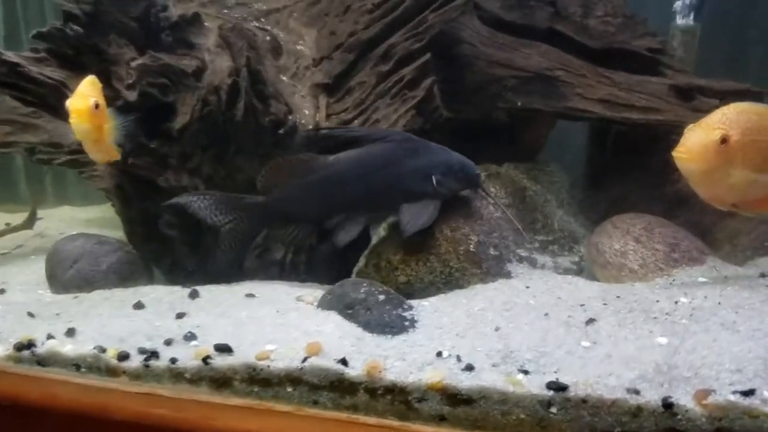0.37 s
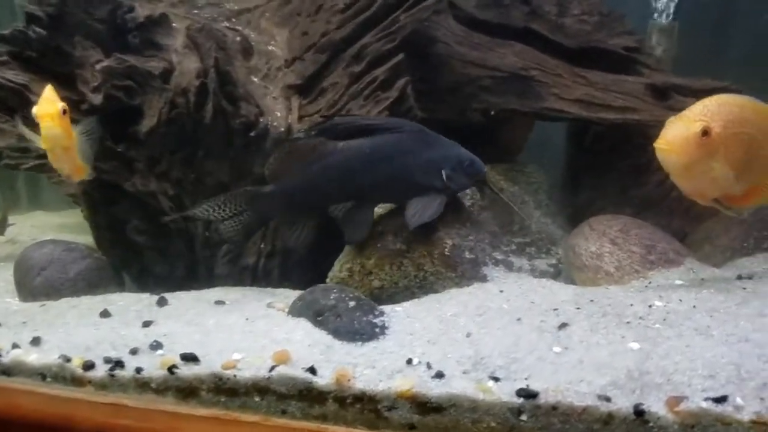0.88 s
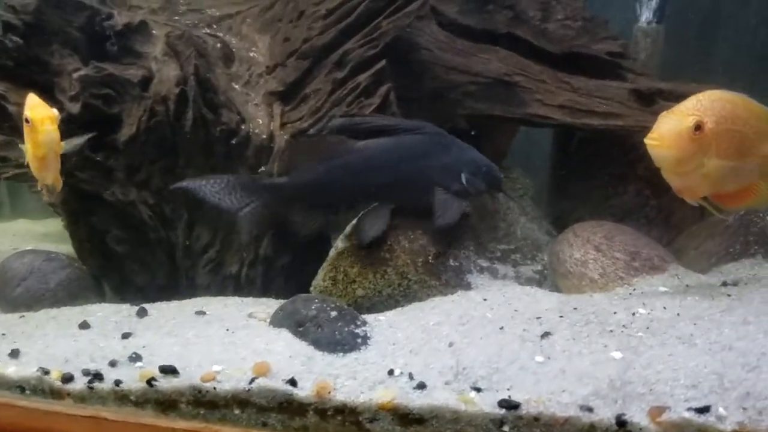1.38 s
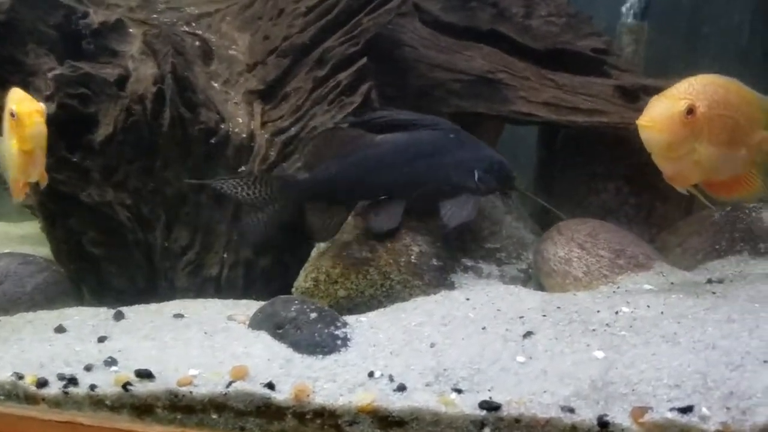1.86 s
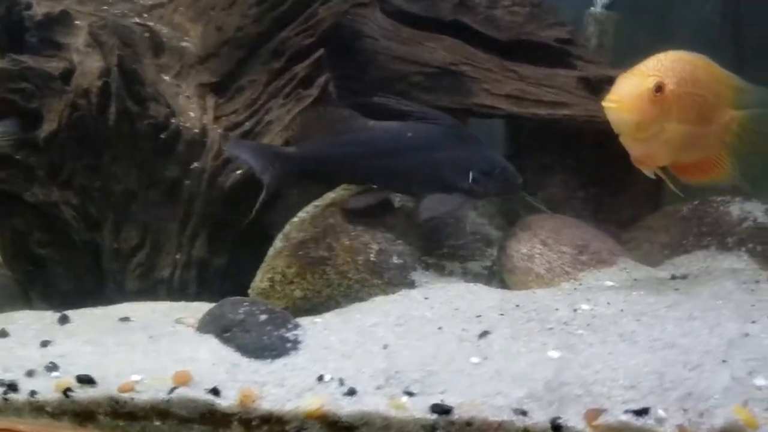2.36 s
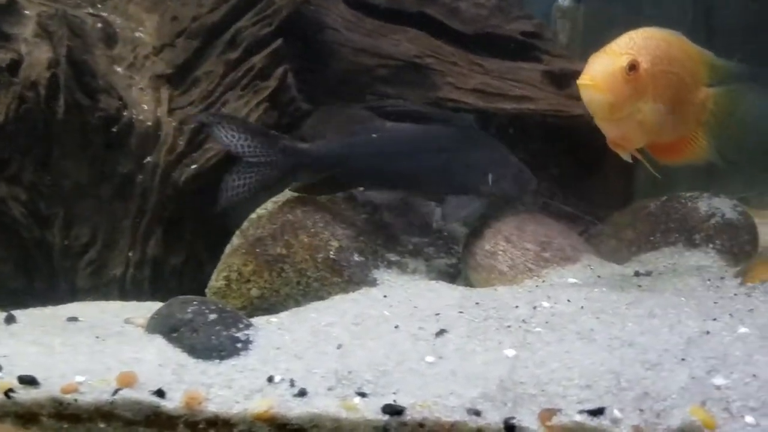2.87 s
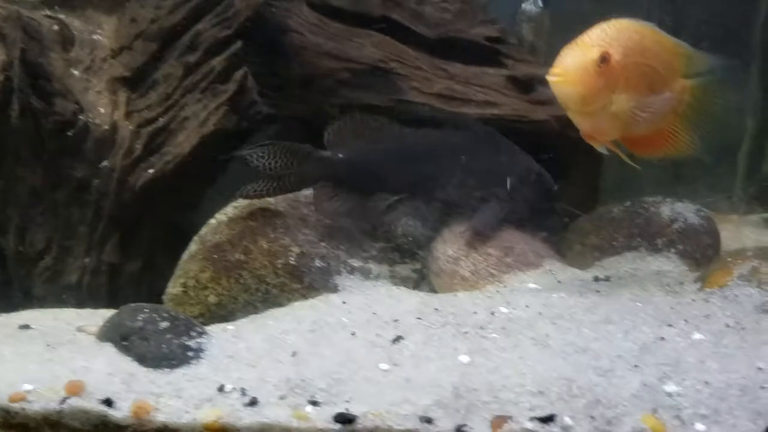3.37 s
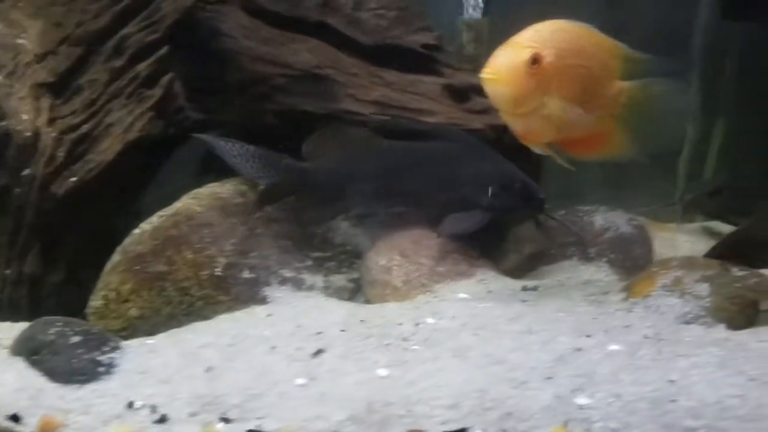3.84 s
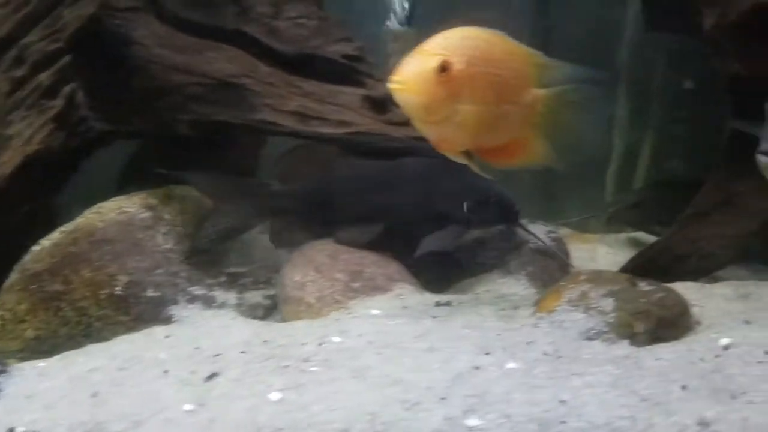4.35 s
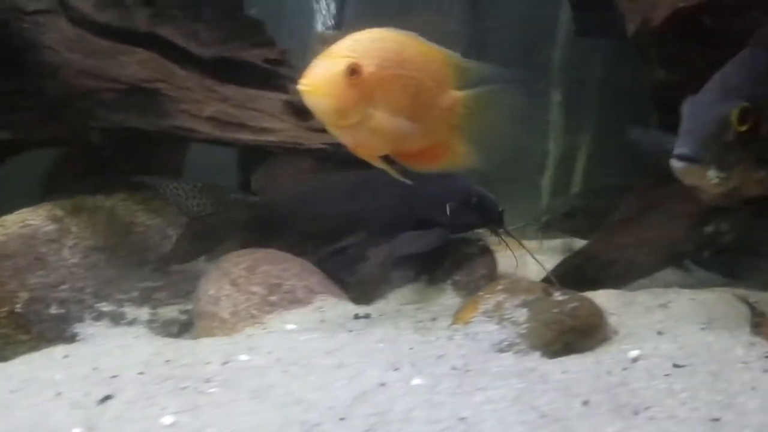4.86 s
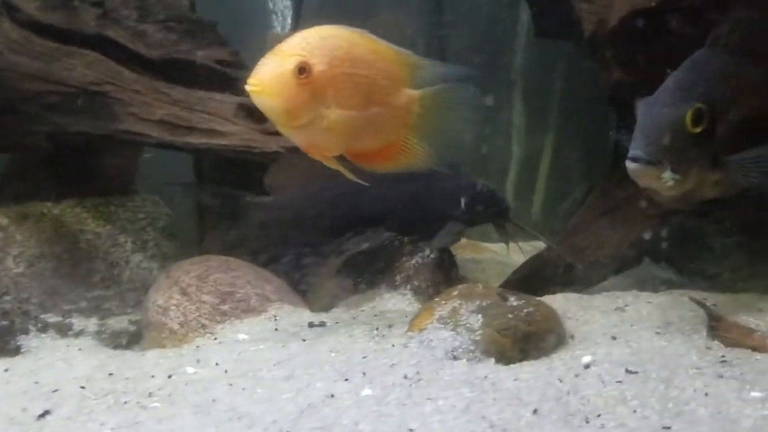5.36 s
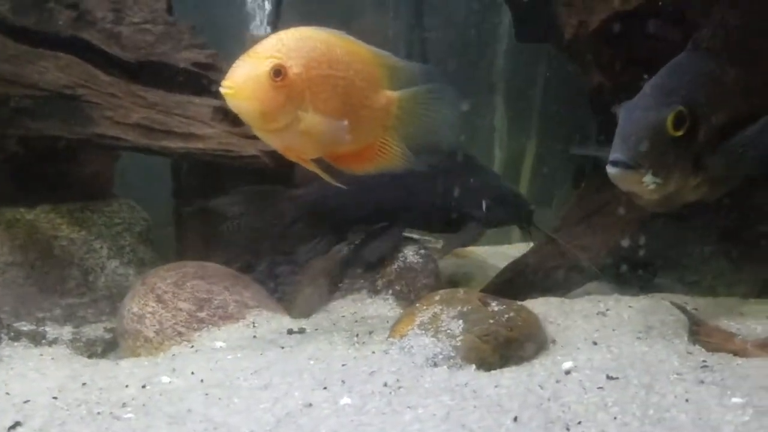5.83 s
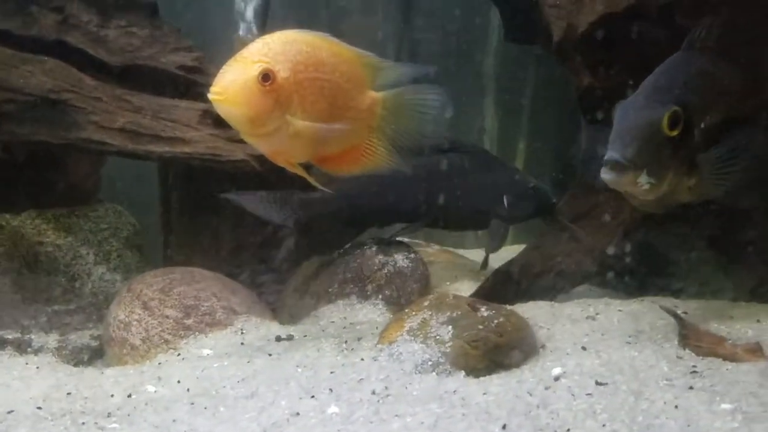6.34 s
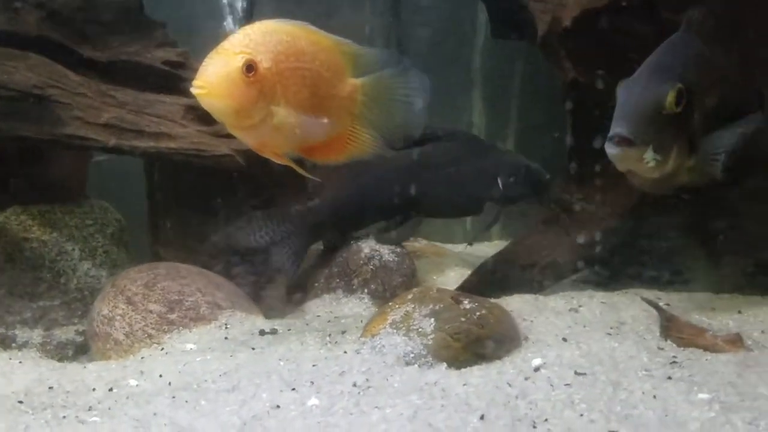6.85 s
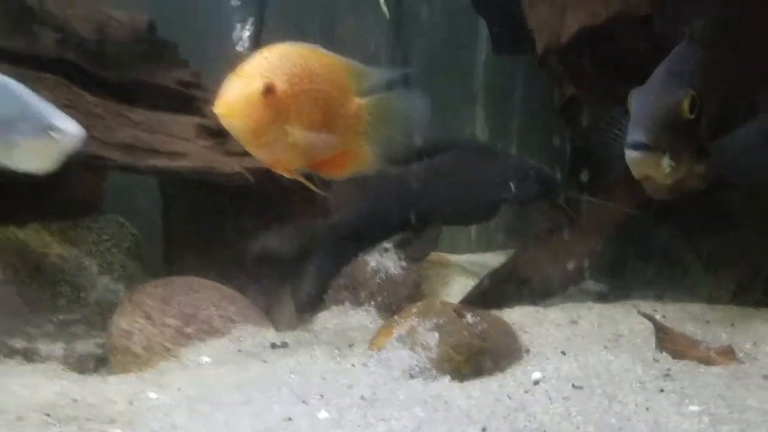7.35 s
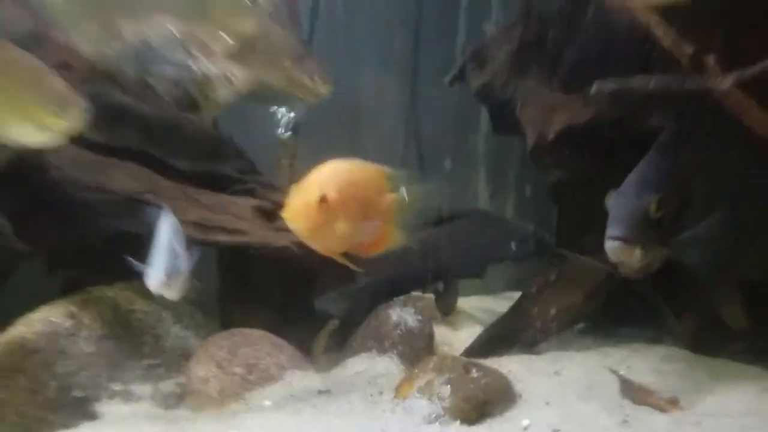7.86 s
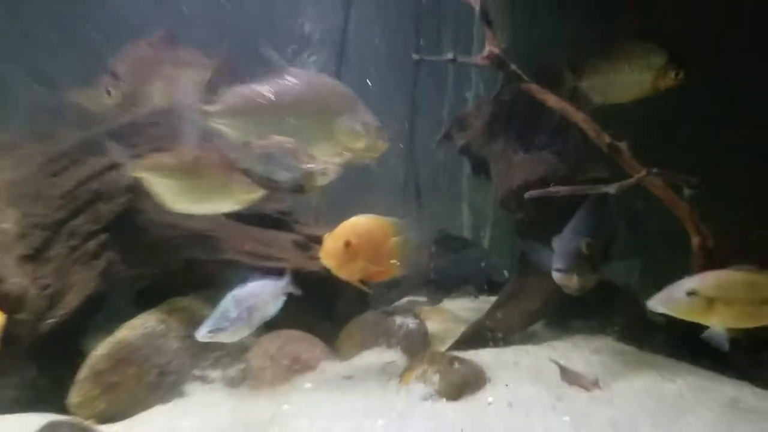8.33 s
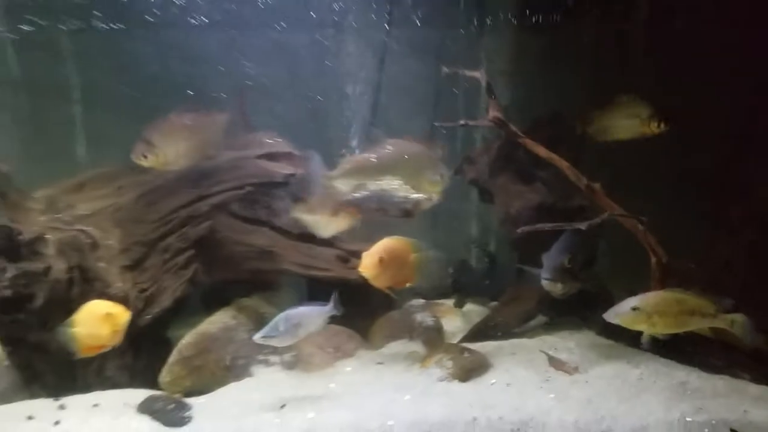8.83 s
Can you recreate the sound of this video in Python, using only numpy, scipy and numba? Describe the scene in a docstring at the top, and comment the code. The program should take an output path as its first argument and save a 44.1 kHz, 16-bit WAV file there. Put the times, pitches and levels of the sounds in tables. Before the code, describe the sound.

From 0 to about 9 seconds a fish tank pump hums continuously indoors: a low 60-hertz-family drone, strongest around 120 and 240 hertz, over a soft rumble of motor and air noise. Much quieter above it are a wavering rotor whine near 850 hertz, gurgling trickle and a smooth fine-bubble fizz. Tiny, very high bubble pops with short bright echoes come irregularly, a sharper one near 3.4 seconds, and clustering more densely from 5 to 7.5. Fizz swells lightly around 1.7 and 3.7. The hand-held stereo phone drifts along the glass, slowly shifting the hum's tone as the whine emerges. Faint tones swell near 3.5, 7.2 and 7.7 seconds. From about 7.5 the phone steps back; trickle and hiss rise, with brief fizz surges near 8.3 and 8.8, while the whine recedes and the hum continues to the end.

```python
"""A pump hums in an indoor fish tank, over trickling water and tiny bubbles that pop with short bright echoes.
The hum is a sum of mains overtones plus a rotor whine; trickle, fizz and pops are dying sines of climbing pitch.
A few faint notes swell up; below lies a rumble of noise lifted or cancelled at the cabinet and room modes.
A hand-held phone with a port at each end hears it while it drifts along the glass and at last steps back."""
import sys
import numpy as np
from scipy import signal
from scipy.fft import rfft, irfft
from scipy.io import wavfile
from scipy.ndimage import uniform_filter1d
from numba import njit

SR = 44100
rng = np.random.default_rng(int(sys.argv[2]) if len(sys.argv) > 2 else 0)


def store_wav(level_fs):
    """Save 16-bit WAV to argv[1]."""
    pcm = np.round(np.clip(np.atleast_2d(level_fs), -1, 1) * 32767)
    wavfile.write(sys.argv[1], SR, pcm.T.astype(np.int16))


def invert_db(x):
    """Field ratio 10**(x/20) for x, a level in decibels (scalar or array-like)."""
    u = np.asarray(x, float) / 20
    return 10 ** u


N = 395136
T = np.arange(N) / SR
HZ = np.arange(N // 2 + 1) * SR / N

# The phone's way along the glass, then back into the room. Each row: time in seconds, metres travelled.
PATH = [(0.0, 0.056), (1.5, 0.036), (3.0, 0.087), (4.5, 0.21), (6.0, 0.25), (7.3, 0.24), (8.0, 0.34),
        (8.96, 0.4)]
WAY_M = np.interp(T, *np.transpose(PATH))
STEP_BACK_M = 0.27  # beyond this the open surface comes into view
BACK_M = np.maximum(WAY_M - STEP_BACK_M, 0)
WAVER_DB = 1.3
POP_CYCLES = 3.2  # ring time in cycles


def level(x, db):
    """Scale to an rms level."""
    return x * invert_db(db) / np.sqrt(np.mean(x ** 2))


def over_hz(table, column=1):
    """Interpolate a dB column over log frequency."""
    table = np.array(table, float)
    return np.interp(np.log(HZ + 1), np.log(table[:, 0]), table[:, column])


def walk(rate_hz):
    """Slow random drift of spread 1: smoothed random steps."""
    k = int(SR / rate_hz)
    steps = np.repeat(rng.standard_normal(N // k + 1), k)
    x = uniform_filter1d(uniform_filter1d(steps, k), k)[:N]
    return x / x.std()


def standing(hz, swing_db, crest_rad, way_m):
    """Level change along a standing wave, which repeats every half wavelength."""
    return swing_db * np.cos(4 * np.pi * hz * way_m / 343 - crest_rad)


def bell(start_s, length_s):
    """Bell-shaped swell of height 1, centred on start_s."""
    return np.exp(-0.5 * (2 * (T - start_s) / length_s) ** 2)


def swells(table, db_per_m):
    """Bell-shaped rises in dB, on top of the gain from stepping back."""
    return db_per_m * BACK_M + sum(db * bell(s, length_s) for s, length_s, db in table)


@njit
def grains(start, hz, cycles, glide, size, length):
    """Each bubble is a dying sine whose pitch climbs by `glide` over its ring time."""
    out = np.zeros(length)
    for k in range(len(start)):
        ring = cycles[k] * SR / hz[k]
        phase = 0.0
        for i in range(min(int(5 * ring), length - start[k])):
            f = min(hz[k] * (1 + glide[k] * i / ring), 0.45 * SR)
            phase += 2 * np.pi * f / SR
            out[start[k] + i] += size[k] * np.exp(-i / ring) * np.sin(phase)
    return out


def swarm(count, low_hz, high_hz, cycles, glide, scatter_db):
    """Bubbles at random moments and sizes, middling pitches most common; 0 dB rms in all."""
    when, pitch_a, pitch_b, big = rng.random((count, 4)).T
    start = (when * N).astype(np.int64)
    hz = low_hz * (high_hz / low_hz) ** ((pitch_a + pitch_b) / 2)
    size = invert_db(-scatter_db * np.log(big + 1e-6))
    one = np.ones(count)
    return level(grains(start, hz, cycles * one, glide * one, size, N), 0)


def at_ports(a, b):
    """Two unrelated signals become the room field at two spaced ports: alike in the bass, unalike above."""
    lag_s, along = 0.00044, 0.27  # port spacing as travel time, share of sound along the axis
    turn = 2 * np.pi * HZ * lag_s
    like = (1 - along) * np.sinc(turn / np.pi) + along * np.exp(-1j * turn)
    like = like / (1 + (HZ / 5200) ** 2)
    a, b = rfft(a), rfft(b)
    return irfft(np.array([a, like * a + np.sqrt(1 - abs(like) ** 2) * b]), N)


def pump():
    """The armature beats once per mains cycle, so overtones peak together; higher ones lag in the housing."""
    # Strong overtones, each a standing wave along the way. Each row: multiple of mains,
    # mean level in dB, swing in dB, place of the crest in rad, left minus right in dB.
    strong = [(2, -42, 1.3, 0.1, 0.8), (3, -51.5, 5, 1.4, 2.0), (4, -46, 2, 2.16, 0.1), (6, -61, 6.5, 1, 4),
              (7, -67, 4, 3, 16)]
    # Steadier weak overtones. Each row: multiple of mains, level in dB, left minus right in dB.
    weak = [(5, -70.5, 24.5), (8, -67.5, 13.5), (9, -67.5, 12), (13, -94, -8)]
    mains_hz, right_lag_s = 60, 0.00026
    side = np.array([[0.5], [-0.5]])
    overtones = [(k, db + standing(k * mains_hz, swing_db, crest_rad, WAY_M), pan_db)
                 for k, db, swing_db, crest_rad, pan_db in strong]
    hum = 0
    for k, db, pan_db in overtones + weak:
        # short high overtones waver as the hand moves through their standing waves
        waver_db = (k > 4) * WAVER_DB * walk(3)
        lag_rad = max(k - 4, 0) * (1.03 + 0.18 * walk(1.48))
        wave = np.cos(2 * np.pi * k * mains_hz * (T + side * right_lag_s) - lag_rad)
        hum = hum + invert_db(db + side * pan_db + waver_db) * wave
    return np.sqrt(2) * hum


def whine():
    """Wavering rotor tone that comes out from behind the cabinet, then fades on stepping back."""
    hz, clear_db, shade_db, clear_m, fade_db_per_m = 853.8, -65, -16, 0.1, 25
    db = clear_db + shade_db * np.exp(-WAY_M / clear_m) - fade_db_per_m * BACK_M
    tone = np.cos(2 * np.pi * hz * T + 0.9 * walk(2.2))
    return np.sqrt(2) * invert_db(db + WAVER_DB * walk(2.95)) * tone


def trickle():
    """A dense stream of mid-sized bubbles under the returning water, gurgling in soft patches."""
    # Swells of the trickle. Each row: centre in seconds, length in seconds, rise in dB.
    gurgles = [(4.33, 0.15, 2), (8.0, 0.33, 1.5)]
    base_db, water_db_per_m, gurgle_db = -66.5, 24, 0.8
    water = at_ports(*(swarm(count=12000, low_hz=1234, high_hz=4270, cycles=5.2, glide=0.036,
                             scatter_db=0.3) for _ in range(2)))
    return water * invert_db(base_db + swells(gurgles, water_db_per_m) + gurgle_db * walk(6.4))


def fizz():
    """Smooth fizz of countless fine bubbles, unrelated at the two ports."""
    # Fine bubbles surfacing together. Each row: centre in seconds, length in seconds, rise in dB.
    shoals = [(1.67, 0.33, 4.5), (3.72, .5, 3), (5.37, 0.45, 1.5), (8.33, .13, 8), (8.8, 0.22, 7)]
    base_db, fizz_db_per_m = -71.5, 13
    fine = np.array([swarm(count=50000, low_hz=5430, high_hz=19500, cycles=3.3, glide=0.05,
                           scatter_db=1.1) for _ in range(2)])
    return fine * invert_db(base_db + swells(shoals, fizz_db_per_m) + 0.98 * walk(12))


def echo(x):
    """Glass, lid and walls spread pops into a short dense tail, new every 40 ms as bubbles burst elsewhere."""
    t60_s, rise_s, block = 0.16, 0.0016, 1764
    t = np.arange(5 * block) / SR
    shape = (1 - np.exp(-t / rise_s)) * np.exp(-np.log(1000) * t / t60_s)
    shape = shape / np.sqrt(np.sum(shape ** 2))
    out = np.zeros((2, N + 6 * block))
    for i in range(0, N, block):
        tail = rng.standard_normal((2, len(t))) * shape
        wet = signal.fftconvolve(x[None, i:i + block], tail, axes=1)
        out[:, i:i + wet.shape[1]] += wet
    return out[:, :N]


def pops():
    """Single bubbles burst at the surface among scattered faint ones, heard by lid reflections and echo."""
    # Single bursts. Each row: start in seconds, peak before the burst gain in dB, heard pitch in Hz.
    bursts = [(0.0558, -61, 10500), (0.4045, -62, 11200), (0.4614, -61, 12000), (0.6679, -61, 10100),
              (0.7008, -54, 13400), (0.8415, -58, 9930), (0.9887, -53.5, 10800), (1.0914, -60, 10600),
              (1.2476, -58, 10800), (1.496, -49.5, 12100), (1.5609, -64, 10800), (1.6551, -58, 13000),
              (2.575, -54.5, 11200), (3.0255, -58, 12200), (3.048, -53, 14800), (3.2176, -61, 10000),
              (3.3064, -58, 12200), (3.3732, -43, 13300), (3.4665, -59, 10600), (3.6406, -62, 10000),
              (3.775, -56, 12300), (3.918, -52, 11900), (4.0138, -61, 9600), (4.0672, -58, 10400),
              (4.6234, -55, 10600), (4.7726, -51.5, 12200), (4.8973, -58, 10700), (4.9317, -60, 13800),
              (5.0155, -54, 9800), (5.2604, -62, 10200), (5.2829, -54, 10800), (5.393, -53, 11700),
              (5.547, -56, 12100), (5.7548, -56, 10000), (5.8551, -60, 8860), (5.882, -53.5, 9750),
              (5.9743, -57, 9900), (5.9953, -54, 12600), (6.0571, -58, 11400), (6.1494, -56, 9700),
              (6.1739, -57, 9260), (6.2208, -59, 9740), (6.3046, -59, 11800), (6.575, -58, 10300),
              (6.6787, -61, 14300), (6.7615, -53, 14300), (6.8344, -56, 12200), (6.8583, -51, 11500),
              (6.9606, -59, 14380), (7.1506, -54, 14800), (7.234, -56, 11500), (7.2634, -55, 14300),
              (7.3073, -58, 9600), (7.3457, -58, 9860), (7.3811, -62.5, 10700), (7.5318, -60.5, 14200),
              (7.881, -57, 10500), (7.9733, -57, 10000), (8.1609, -57.5, 8800), (8.2172, -59, 10800),
              (8.5525, -56, 10400), (8.6298, -53.5, 10000)]
    burst_db = 13.5  # energy is spread over the whole echo, so the burst itself is far louder
    pitch_start, lid_db = 0.85, -23.5  # first pitch as a share of the heard one
    faint = swarm(count=400, low_hz=6450, high_hz=16000, cycles=POP_CYCLES, glide=0.14, scatter_db=0.5)
    s, peak_db, hz = np.transpose(bursts)
    one = np.ones(len(s))
    single = grains((s * SR).astype(np.int64), pitch_start * hz, POP_CYCLES * one, 0.24 * one,
                    invert_db(peak_db), N)
    dry_pops = invert_db(burst_db) * (invert_db(-88.5) * faint + single)
    # first few ms of reflections under the lid: the crisp edge
    lid = rng.standard_normal((2, 260)) * np.exp(-np.arange(260) / 120)
    edge = signal.fftconvolve(dry_pops[None], lid, axes=1)[:, :N]
    return invert_db(lid_db) * edge + echo(dry_pops)


def notes():
    """Faint tones of slightly wavering phase that swell up briefly."""
    # Each row: centre in seconds, length in seconds, pitch in Hz, peak in dB.
    tones = [(7.2, .12, 790, -59), (7.7, .25, 780, -59.5), (3.5, .5, 736, -65)]
    return sum(invert_db(db) * bell(s, length_s) * np.cos(2 * np.pi * hz * T + 1.2 * walk(6))
               for s, length_s, hz, db in tones)


def rumble(count=8):
    """Motor and air noise shaped by room and cabinet modes, crossfaded between places along the way."""
    # Broad noise spectrum. Each row: frequency in Hz, relative density in dB per Hz.
    spectrum = [(6, -45), (15, -25), (30, -6), (60, -7), (100, -6.5), (170, -4.5), (260, -9.5),
                (400, -17.5), (700, -21.5), (1200, -28.5), (1700, -35), (2500, -39.5), (3800, -42.5),
                (6000, -44), (9000, -52), (16000, -62)]
    # Modes that lift or cancel the noise. Each row: frequency in Hz, width in Hz,
    # mean lift in dB, swing in dB, place of the crest in rad.
    modes = [(36.3, 6.0, 9, 0, 2.3), (51.0, 8.0, 2.5, 7, 0), (72.8, 4, 6.5, 20, 2.25),
             (86, 9.5, -10, 13, 1.6), (145, 6.4, -5, 6.5, 0.1), (161.2, 3.8, 6.5, 1.5, -0.15),
             (194.2, 19, -0.7, 9, 0.92), (226, 8.1, 3, 6, -2.3), (329.7, 10.4, 6.5, 1, -2.9),
             (380.0, 5, 0.5, -10, -13), (393, 14, 2, 3.5, 0.6), (406, 12, -4.5, 4.5, 1),
             (431, 4.9, 5.5, 5, 2.5), (458.0, 14.0, 1, 9.5, 8), (501, 20, 6, 3, 0.6),
             (528, 10, 2.5, 7, -1.2), (589, 48.0, 4, -0.8, -4), (652.0, 33, 3.5, 3.5, 2.5),
             (730, 11.0, 9.5, 4, 3.5), (772, 11, 4, 1, -3), (884, 33, 3.5, 1.7, 2), (927, 19.0, 3, 2, 2),
             (1150, 28, 4.5, 0.5, 2.5), (1330, 70.0, 1.4, 0, 2)]
    rumble_db, most_lift_db = -40, 10
    noise = rfft(at_ports(*rng.standard_normal((2, N)))) * invert_db(over_hz(spectrum))
    places_m = np.linspace(0, WAY_M.max(), count)
    low = HZ < 3000
    out = 0
    for place_m, near in zip(places_m, np.eye(count)):
        db = np.zeros(len(HZ))
        for hz, width_hz, mean_db, swing_db, crest_rad in modes:
            lift_db = min(mean_db + standing(hz, swing_db, crest_rad, place_m), most_lift_db)
            db[low] += lift_db / (1 + (2 * (HZ[low] - hz) / width_hz) ** 2)
        out = out + np.interp(WAY_M, places_m, near) * irfft(noise * invert_db(db), N)
    return level(out, rumble_db)


def scene():
    """Everything as it reaches the two ports."""
    return pump() + whine() + trickle() + fizz() + pops() + notes() + rumble()


def roll_off(x):
    """The treble ends steeply here."""
    return signal.sosfilt(signal.butter(12, 15790, fs=SR, output="sos"), x)


def record(dry):
    """Each port has its own treble dip and resonance; the top is cut."""
    # Port responses. Each row: frequency in Hz, left gain in dB, right gain in dB.
    responses = [(150, 0, 0.5), (405, -0.5, 0.5), (700, 1.5, 0), (1380, 5, 5), (2200, 2, 5),
                 (4600, -1.5, 1), (8860, -14, 0), (9700, -3, 5), (10500, 0, 2.5), (13000, 3.5, 2.5),
                 (15500, -1, 8.5)]
    top_hz = 15780
    gain = invert_db(np.array([over_hz(responses, column=1), over_hz(responses, column=2)])) * (HZ < top_hz)
    mix = irfft(rfft(dry) * gain, N)
    return roll_off(mix)


dry = scene()
out = record(dry)
store_wav(out)
```